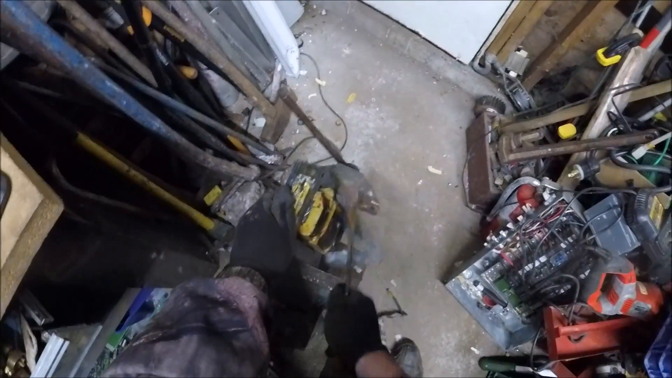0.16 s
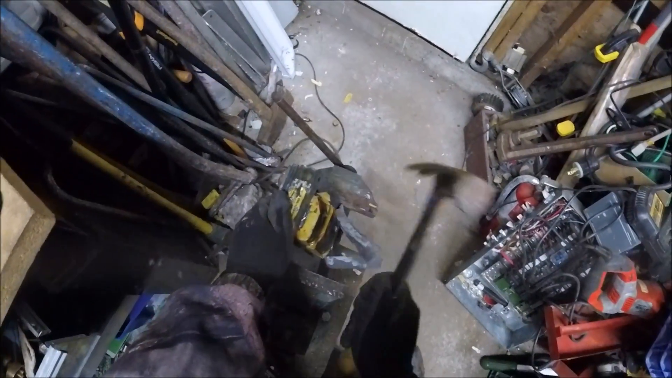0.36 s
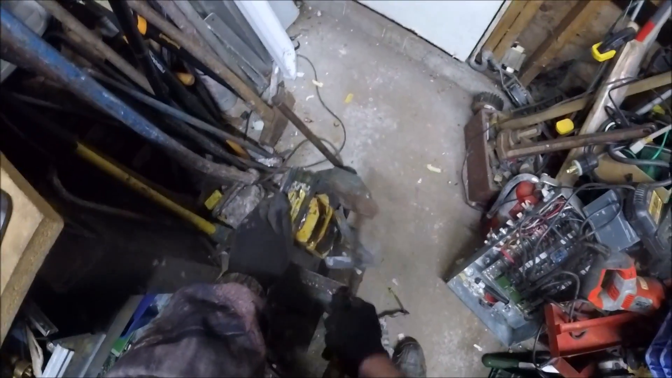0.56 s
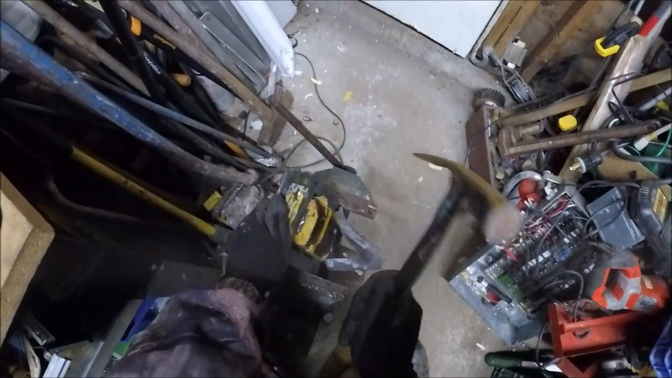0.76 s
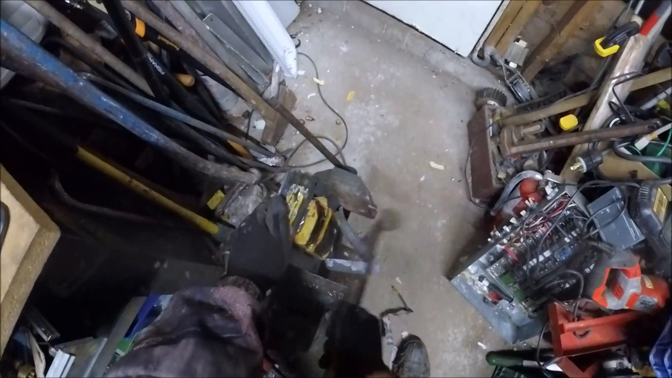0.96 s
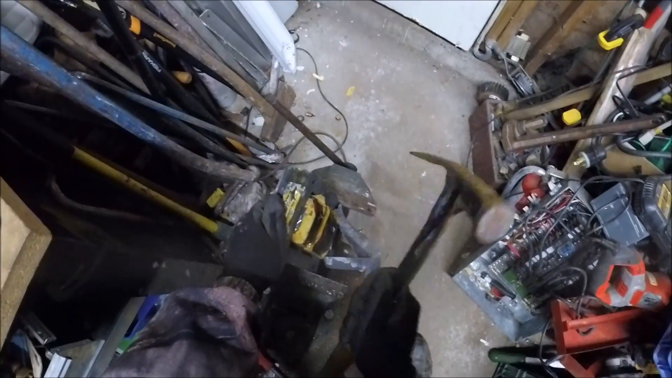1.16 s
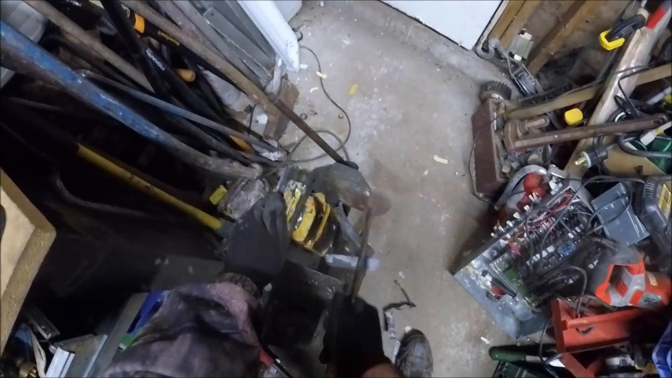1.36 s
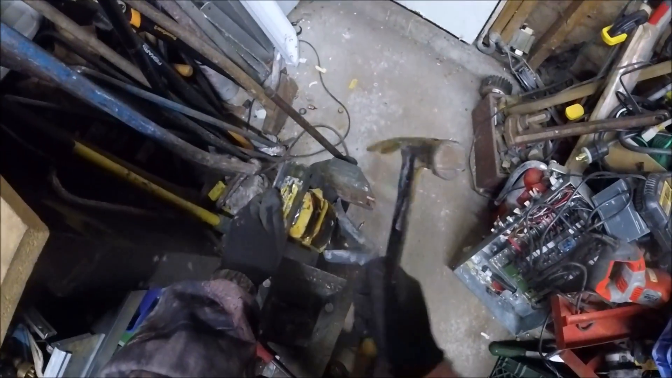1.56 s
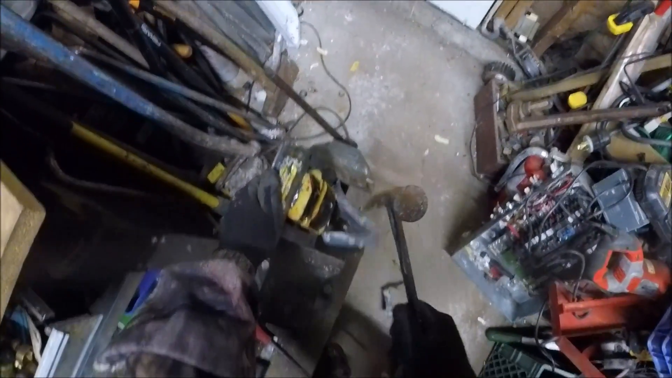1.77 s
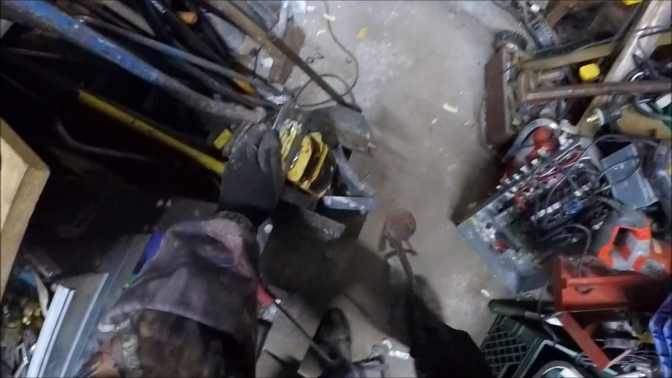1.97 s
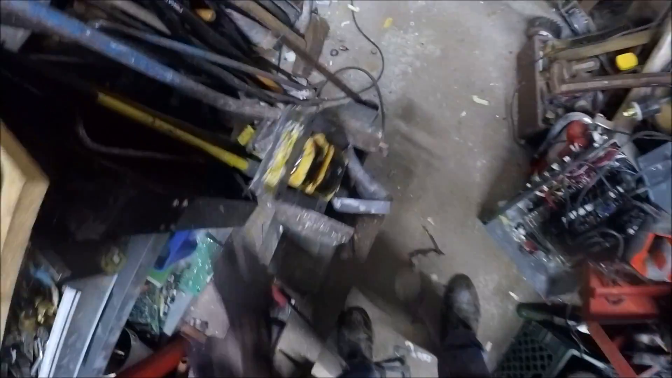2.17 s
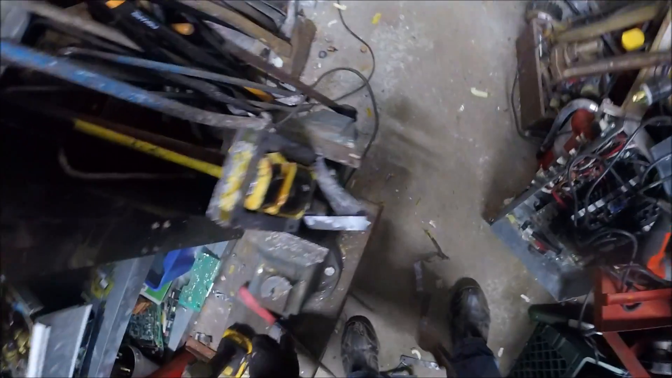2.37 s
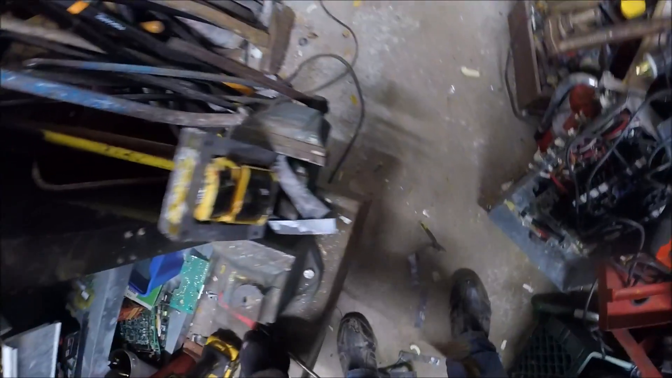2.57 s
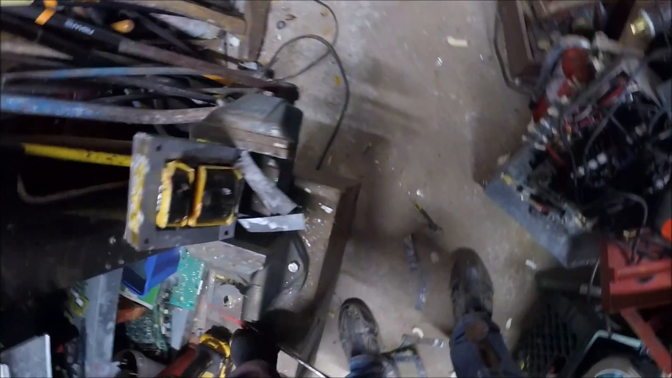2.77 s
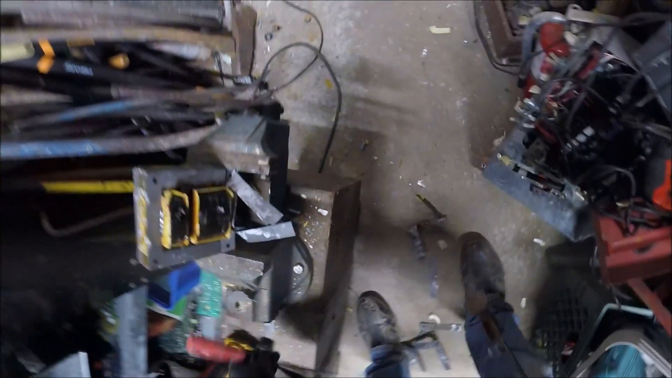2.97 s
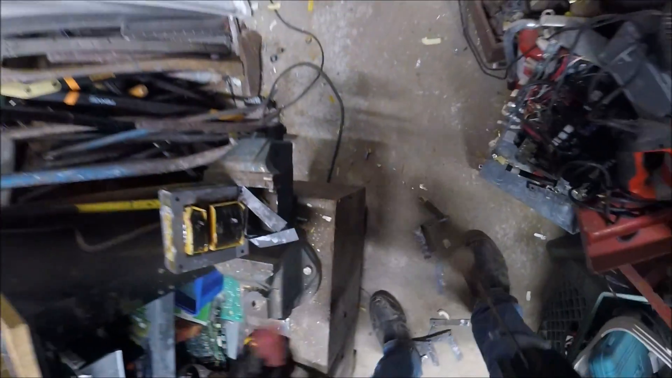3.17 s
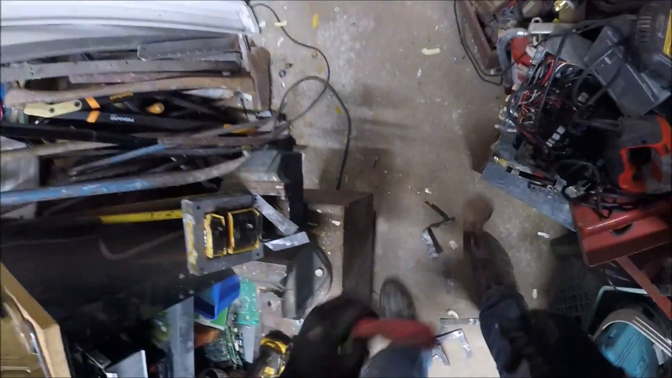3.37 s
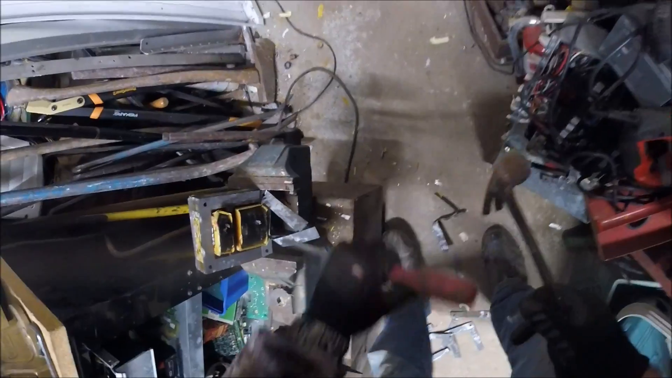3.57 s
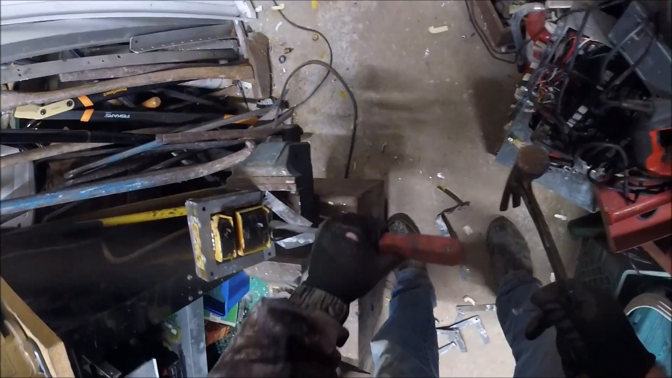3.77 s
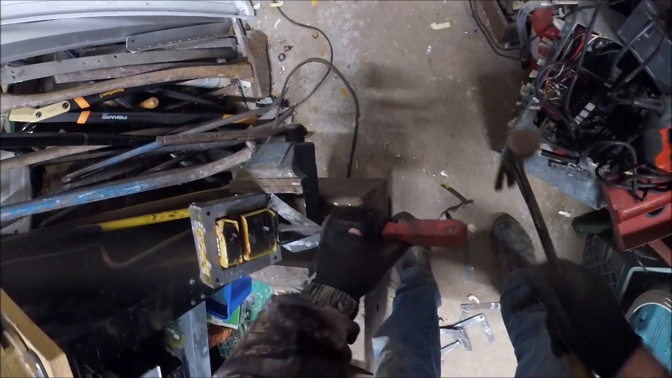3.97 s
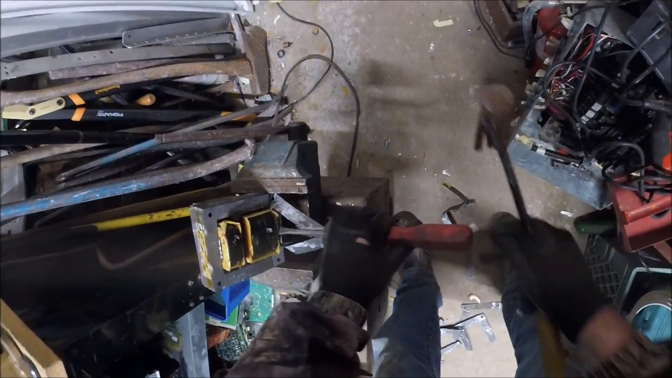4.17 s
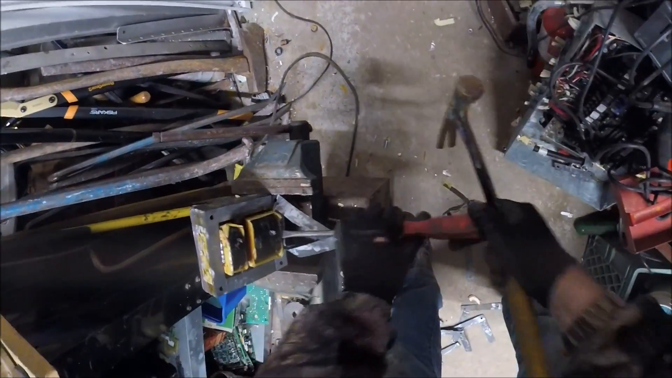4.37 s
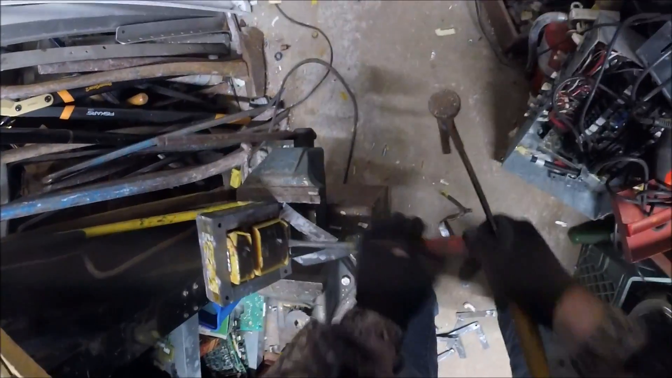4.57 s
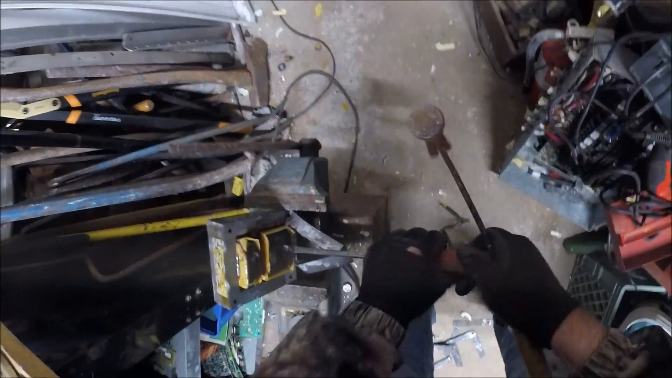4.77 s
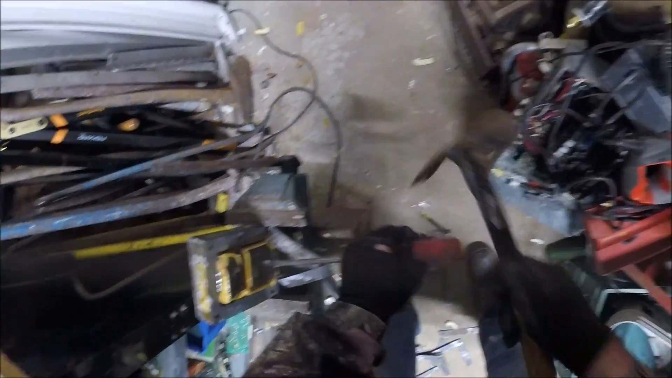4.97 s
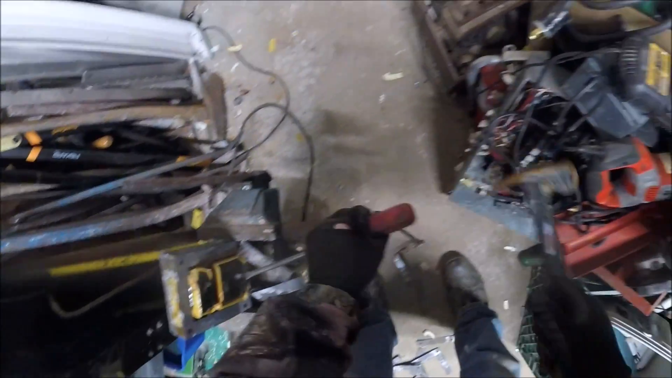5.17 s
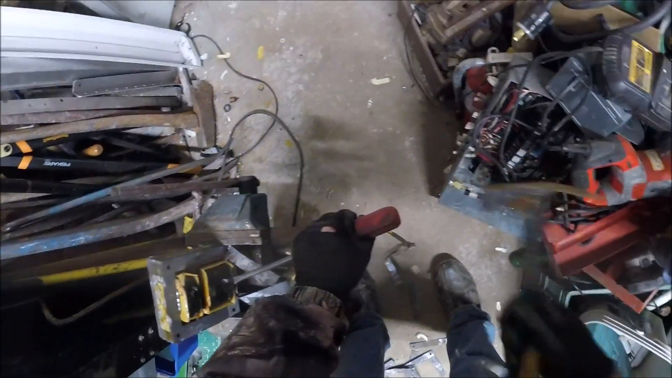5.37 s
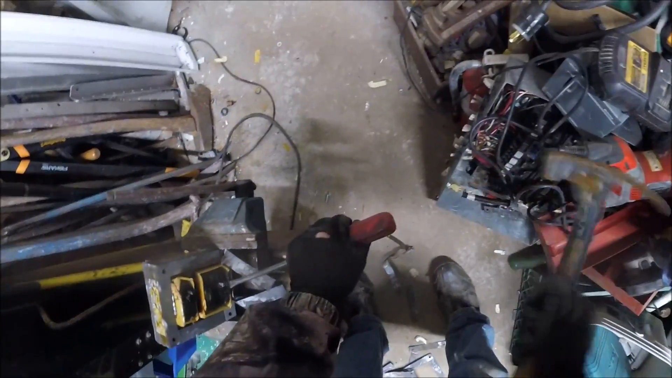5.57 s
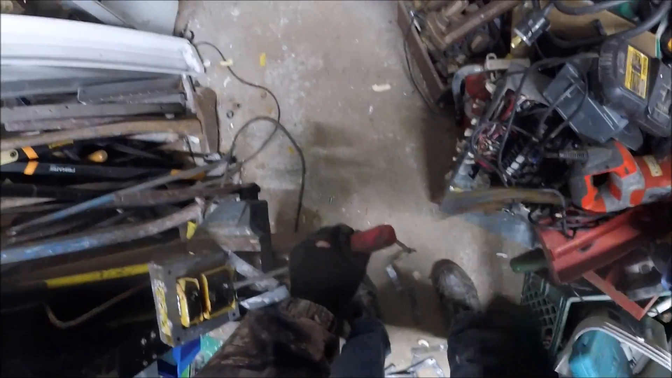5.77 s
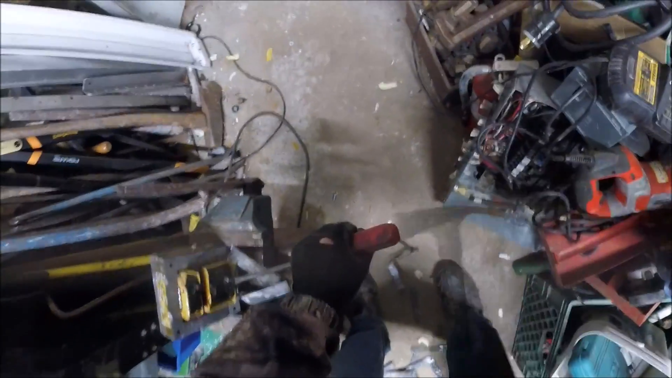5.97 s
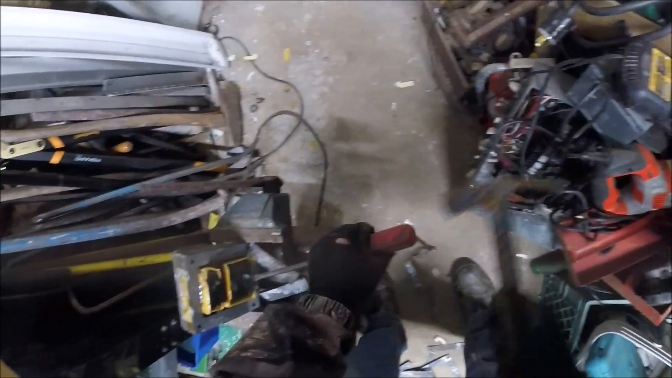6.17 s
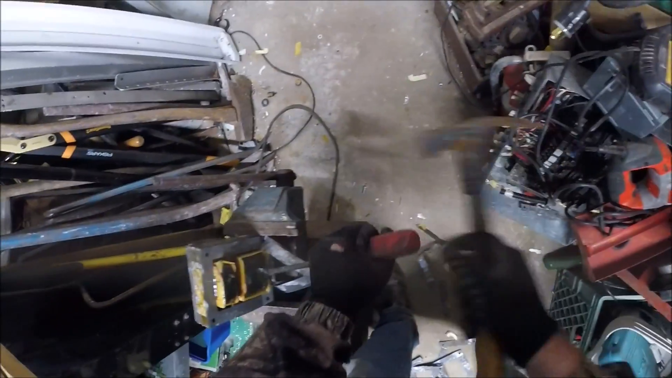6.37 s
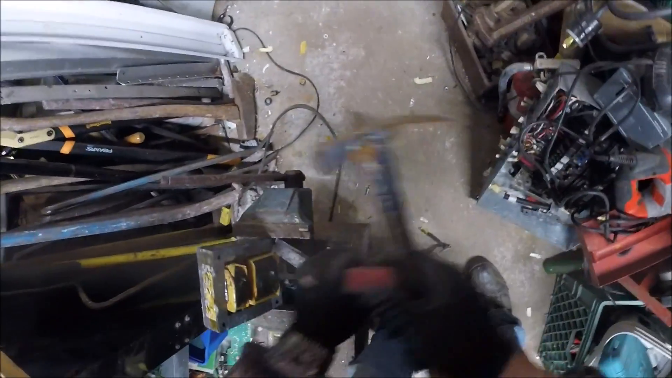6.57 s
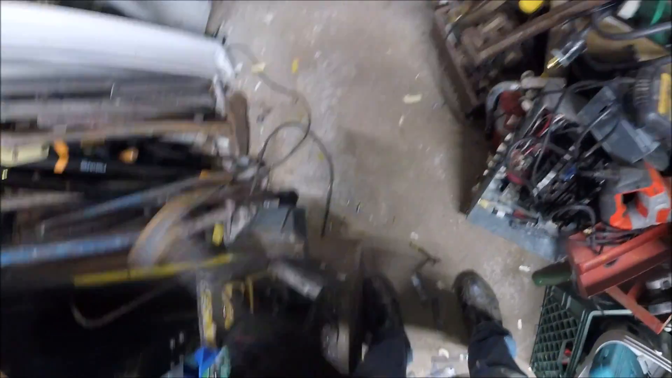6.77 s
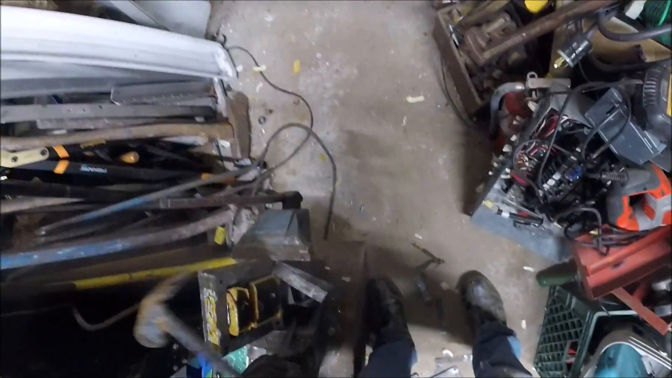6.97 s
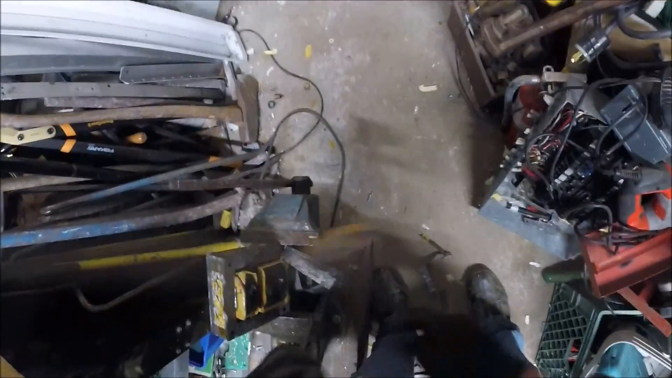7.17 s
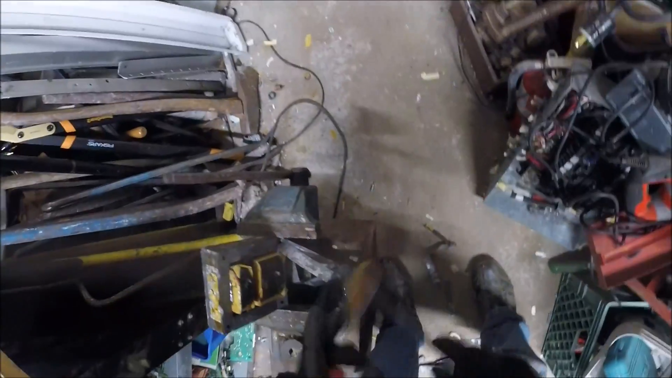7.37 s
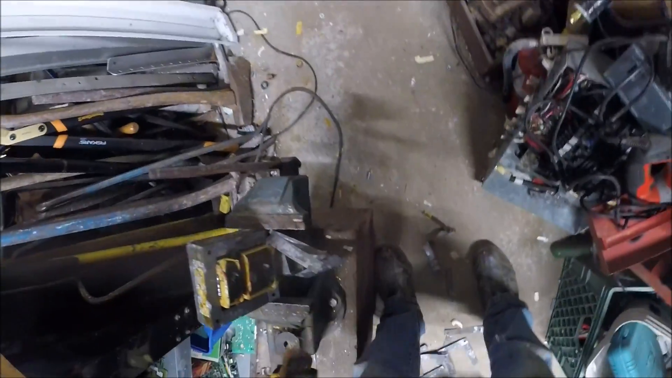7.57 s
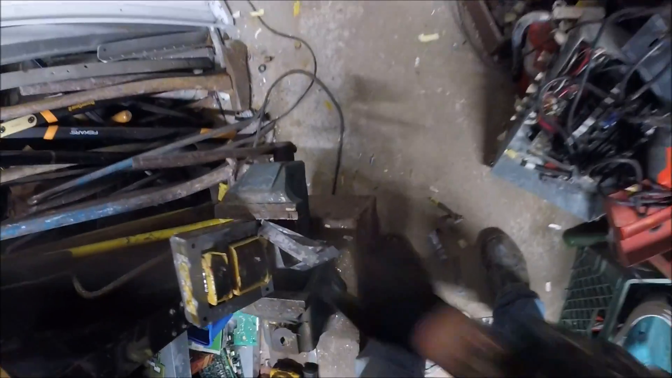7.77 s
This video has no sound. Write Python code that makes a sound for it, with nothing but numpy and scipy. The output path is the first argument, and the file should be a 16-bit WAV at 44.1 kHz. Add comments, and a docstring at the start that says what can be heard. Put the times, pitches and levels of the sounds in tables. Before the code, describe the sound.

Four hard hammer blows on a steel chisel, each bouncing with metallic rattle, then handling, scrap knocks and a small metal core dragged onto a bench.

```python
"""In a cluttered shed, a hammer drives a chisel four times into a small core in a vise; chisel and core
bounce and the loose vise handle ticks on. After some handling the hammer knocks on scrap, and the core
is dragged and set down on the bench. Hits are noise bursts through ringing modes, rubs are slipping noise,
booms and bumps are pushed modes; sparse echoes and moving room tone surround them."""
import sys
import numpy as np
from scipy import signal
from scipy.fft import rfft, irfft, next_fast_len
from scipy.io import wavfile
from scipy.ndimage import uniform_filter1d

SR = 44100
rng = np.random.default_rng(int(sys.argv[2]) if len(sys.argv) > 2 else 0)


def transcribe(u):
    """Save the signal u as a 16-bit wav file named by the first command-line argument.

    u: samples, shape (n,) or (channels, n), limited to [-1, 1]; the rate is SR.
    q: integer samples, one column per channel.
    """
    v = np.clip(np.atleast_2d(u).T, -1, 1)
    q = np.round(v * 32767).astype(np.int16)
    wavfile.write(sys.argv[1], SR, q)


N = 344421

# In strikes and rubs "level" is the treble, and "mids" is the energy of the mids against that treble.
# Spectra and modes hold relative levels; t60 is for a free, undamped part.

# room tone and cloth rustle: (frequency [Hz], relative level [dB])
AIR = [(79, -27), (135, 14.5), (194, 7), (562, -3), (1420, -12), (1990, -17.5), (2590, -14), (3490, -26),
       (5550, -20.5), (10100, -31), (14500, -45.5), (15500, -47.5), (16400, -80.5)]
# how the room tone moves: (time [s], relative low level [dB], relative high level [dB])
STIR = [(0.0, -50, -54), (0.41, -49.5, -51.5), (1.28, -54.5, -60.5), (1.48, -49, -58), (1.61, -51, -59),
        (2.0, -45, -50.5), (2.15, -46.5, -58.5), (2.46, -44, -53), (2.89, -50, -59), (3.44, -42.5, -52),
        (3.81, -43.5, -53.5), (4.28, -50, -62.5), (4.48, -44, -54), (5.07, -50.5, -55), (5.96, -46, -50.5),
        (6.46, -46.5, -58), (6.85, -45.5, -52), (7.81, -45.5, -52.5)]
# echoes of the shed: (frequency [Hz], t60 [s])
SHED_DECAY = [(200, 0.49), (1000, 0.15), (5000, 0.21), (12000, 0.24)]
# narrow bands of hiss: (start [s], end [s], pitch [Hz], width [Hz], mean level [dB])
HISSES = [(2.16, 2.72, 1350, 220, -53.5), (2.09, 2.72, 990, 200, -58.5), (5.113, 5.18, 1660, 1000, -49),
          (2.44, 6.6, 2630, 160, -74.5)]

# gloves and sleeves brush: (start [s], loudest [s], end [s], level [dB], mids [dB])
BRUSHES = [(0.066, 0.11, .16, -50, 4.5), (0.803, 0.821, .89, -49, 0.5), (1.185, 1.215, 1.27, -55, 7.5),
           (1.912, 2.017, 2.1, -49.5, 4.5), (3.156, 3.25, 3.31, -39.5, -19), (3.299, 3.394, 3.46, -48, -7),
           (3.517, 3.556, 3.6, -42, 3), (3.996, 4.033, 4.08, -44, -2), (4.38, 4.399, 4.45, -37.5, -7),
           (4.924, 4.984, 5.02, -54.5, -5), (5.264, 5.29, 5.45, -52.5, -3)]
# soft bumps of boots and hands; the first row is the bench still ringing from an earlier blow: (time [s], peak
# [dB], pitch [Hz])
BUMPS = [(0.004, -44, 412), (2.059, -36, 227), (3.855, -23.5, 217), (4.036, -32.5, 213), (4.4, -33.5, 267),
         (6.493, -35, 343), (7.249, -28.5, 350), (7.776, -35.5, 283)]
# the loose vise handle and small parts tick: (time [s], level [dB], favoured ring [Hz])
TICKS = [(0.0165, -33, 5400), (0.1131, -33.5, 5560), (0.345, -30.5, 5260), (0.3855, -34, 5800),
         (0.4277, -34, 6240), (0.4752, -33, 6170), (0.717, -40.5, 5250), (0.764, -38.5, 4940),
         (1.4044, -22, 4750), (1.454, -20, 5300), (1.498, -28.5, 5200), (1.581, -28, 6200),
         (1.6323, -32, 6980), (1.7426, -34, 4400), (1.7923, -34, 4930), (1.8484, -33, 5900),
         (1.8972, -30, 5450), (2.0048, -29, 6080), (2.054, -34.5, 5740), (2.111, -42, 4680),
         (2.163, -42.5, 6230), (2.325, -34, 4770), (2.376, -35.5, 6460), (2.477, -50, 4900),
         (2.5676, -53, 4900), (2.6574, -45, 5270), (3.1667, -43, 5220), (3.2157, -35.5, 5130),
         (3.71, -51, 5240), (3.8372, -48, 5350), (4.265, -40, 7570), (4.275, -43.5, 5400),
         (4.3084, -47, 5100), (4.3834, -33, 4960), (4.529, -43.5, 5500), (4.5591, -37.5, 5240),
         (4.6039, -39.5, 5300), (4.6305, -36.5, 5700)]
# a hollow part is knocked: (time [s], peak [dB], rings for [s], damping factor, favoured ring [Hz])
CLUNKS = [(7.474, -23.5, 0.061, 0.73, 396), (7.537, -17.5, 0.034, 1.5, 2370)]
# the chisel touches the hammer: (time [s], peak [dB])
CLINKS = [(4.3829, -36), (4.4016, -23)]

# fast sweep of the core towards the bench: (time [s], level [dB], mids [dB])
SWEEP = [(6.68, 6, 17), (6.686, -27, -2.5), (6.728, -21, -8.5), (6.753, -28.5, -9), (6.764, -15.5, -0.5),
         (6.794, -42, 4.5), (6.92, -48.5, 3)]
# the core drags over the bench: (start [s], loudest [s], end [s], level [dB], mids [dB])
DRAGS = [(6.93, 7.072, 7.11, -38, 6.5), (7.086, 7.119, 7.2, -35, 9), (7.221, 7.237, 7.29, -38.5, 8.5),
         (7.325, 7.354, 7.4, -26.5, 2)]
# the dragged core catches and slips: (time [s], level [dB], mids [dB])
SLIPS = [(6.9702, -41, -2), (6.9915, -38.5, 10), (7.007, -30.5, 3), (7.0228, -28.5, 3), (7.0326, -28.5, -1),
         (7.044, -26, -5), (7.0537, -22, -11), (7.0612, -23, -15), (7.084, -31.5, 5), (7.1148, -26, -2),
         (7.1222, -21.5, -6), (7.1394, -32, -6), (7.1561, -32, 3), (7.2479, -32.5, -8), (7.2555, -38, 17.5),
         (7.3372, -23, -10), (7.3541, -15.5, -8), (7.3597, -19, -14)]
# the hammer knocks on scrap, then the core lands on the bench:
KNOCKS = [(5.67, -9.5, 1.5, 1034, -9.5), (5.7735, -34, -17, 6100, None), (5.881, -43, -27.5, 5260, None),
          (5.9803, -9.5, -1, 1034, -12.5), (6.2126, -8.5, -16.5, 5200, -40), (6.4744, -22, -10, 5200, None),
          (6.5595, -31, -15, 5550, None), (6.636, -35.5, -6, 4590, None), (6.6512, -23, -10, 4850, None),
          (6.6868, -21.5, -7, 5600, -23.5), (6.7197, -15.5, -8, 5640, None),
          (6.7543, -14.5, -0.5, 5350, -24), (6.7624, -19, 3.5, 1460, -15.5), (7.5394, -27, 14.5, 2270, -32),
          (7.626, -50, 1, 4970, None)]
# the chisel skids off the core: (start [s], loudest [s], end [s], level [dB], mids [dB])
SKID = (1.408, 1.424, 1.448, -19, -14)
# chisel blows: (time [s], level [dB], chisel seats after [s], seating level [dB], bounce after [s],
# bounce level [dB], bounce mids [dB], last bounce after [s], last bounce level [dB],
# bench boom reference [dB], boom peak of the bounce [dB])
BLOWS = [(0.161, -13, 0.0063, -11.5, 0.043, -11.5, -20, 0.082, -24, -13, -26),
         (0.5257, -14.5, 0.0058, -12, 0.035, -11, -16, .074, -23.5, -15, -22),
         (0.895, -10, 0.01, -13, 0.041, -13.5, -5, .0582, -10.5, -16.5, -18.5),
         (1.281, -10.5, .0072, -14.5, .0347, -13.5, -5.5, .0565, -13, -16, -7)]
# bench booms under each blow: (after the blow [s], peak against the boom reference [dB], favoured ring [Hz])
BOOMS = [(.005, -0.5, 298), (.021, -2.5, 357), (.049, -6, 160)]

# hollow part: (frequency [Hz], relative level [dB], t60 [s])
HOLLOW = [(430, -8, .3), (942, -1, .16), (1160, -10, .1), (2336, -6, .08), (3800, -15, .04),
          (5642, -14, .07)]
# lone chisel: (frequency [Hz], relative level [dB], t60 [s])
CHISEL = [(3540, -6, 0.065), (4450, -16, 0.11), (5000, 0, .15), (5520, -10, .06), (6000, -10, 0.11)]
# small core: (frequency [Hz], relative level [dB], t60 [s])
CORE = [(624, -17, .1), (754, -17, .1), (943, -14, .08), (1443, -9, .12), (1575, -10, .1), (1696, -11, .09),
        (1857, -10, .1), (2100, -14, .07), (2336, -8, .09), (2772, -16, .06), (3332, -18, .05),
        (3795, -8, .045), (4474, -13, .045), (5249, -5, .04), (5459, 0, .045), (5766, -5, .04),
        (7472, -18, .05)]
# scrap metal: (frequency [Hz], relative level [dB], t60 [s])
SCRAP = [(1034, -38, .55), (1720, -20, .08), (2570, -18, .08), (3300, -20, .1), (4600, -10, .1),
         (4900, -5, .09), (5100, 0, .05), (5450, -3, .07), (5880, -5, .1), (6200, -6, .1), (6400, -8, .1),
         (7500, -12, .08), (8100, -13, .07), (9000, -20, .07)]
# bench: (frequency [Hz], relative level [dB], t60 [s])
BENCH = [(154.2, 2.5, 0.29), (181.7, 4.5, 0.13), (222.5, 4, 0.17), (266.5, 10, 0.078), (314.8, 0.5, 0.16),
         (362, 3, 0.12), (514, -10, 0.066), (649, 2.5, 0.058), (773, -8, 0.04), (940, 3, 0.055)]
# vise and chisel steel: (frequency [Hz], relative level [dB], t60 [s])
VISE = [(4000, -59.5, 0.084), (4470, -22, 0.31), (4830, -4, 0.13), (5280, 4, 0.04), (5800, 5.5, 0.013),
        (6296, -0.5, 0.043), (7030, -1, 0.016), (6970, -6.5, 0.046), (7570, 4.5, 0.028),
        (8300, -3.5, 0.029), (8460, -22, 0.13), (9020, -52.5, 0.04), (9889, -34, 0.22),
        (10160, -16.5, 0.17), (10560, -13, 0.054), (11630, -32, 0.2)]

# colour of the brushes and the sweep: (frequency [Hz], relative level [dB])
RUB = [(240, -66.5), (400, -10), (818, -15), (955, -8.5), (1920, -9.5), (2920, -7), (4180, -4), (5200, 3),
       (10100, -14), (14700, -53), (16400, -86.5)]
# colour of core on bench: (frequency [Hz], relative level [dB])
SCUFF = [(240, -44), (400, -24), (768, -2), (912, -8), (1590, -10), (3020, -5), (5440, 2), (6460, -11),
         (9980, -22), (16400, -75)]
# colour of steel on steel: (frequency [Hz], relative level [dB])
CRACK = [(260, -26.5), (450, -11.5), (564, -17.5), (1210, -9), (2090, -12.5), (3430, -7), (3810, -13),
         (5720, 3.5), (6550, -8.5), (10100, -11), (12000, -28), (13900, -26), (16400, -69)]

SIZE = 13824  # length of a ring or burst, in samples
LOW_CUT_HZ, EDGE_HZ, DEEP_DB = 157.5, 16450, -75
PLACE_DB = 3.5  # how much the struck spot changes each mode
PRESSED, HELD = 2.2, 4.0  # how much faster parts die out pressed on the bench or held in gloves
# from when ticking parts are held, the core is hit, the core lies down
IN_GLOVES_S, ON_CORE_S, ON_BENCH_S = 3, 6.6, 7
# stroke edges, against the loudest moment
BRUSH_START_DB, BRUSH_END_DB = -17.5, -12
DRAG_START_DB, DRAG_END_DB = -13, -24
SKID_START_DB, SKID_END_DB = -4, -10
TICK_MIDS_DB, TICK_CONTACT_S, HELD_CONTACT_S = -12, 0.0045, 0.002
SLIP_CONTACT_S = 0.0017
KNOCK_CONTACT_S, KNOCK_BOOM_S, SCRAP_BOOM_HZ, CORE_BOOM_HZ = 0.0023, 0.0035, 163, 293
BLOW_MIDS_DB, BLOW_CONTACT_S = -9, 0.0023
SEAT_MIDS_DB, SEAT_CONTACT_S = -4, 0.0036
BOUNCE_CONTACT_S, BOUNCE_BOOM_HZ = 0.0035, 350
LAST_MIDS_DB, LAST_CONTACT_S = -16.5, 0.0032
# stray contacts after each blow: count, span, level against the blow, further fade over the span
RATTLES, RATTLE_S, RATTLE_DB, RATTLE_FADE_DB = 4, 0.12, -4, -22
RATTLE_MIDS_DB, RATTLE_CONTACT_S = -18.5, 0.0023


def gain_of(db):
    """Decibels to amplitude."""
    return np.exp(np.asarray(db) * np.log(10) / 20)


def evened(x):
    """Bring the RMS to 1."""
    return x / np.sqrt(np.mean(x ** 2) + 1e-20)


def read(points, hz):
    """Read a table of (frequency, value) along log frequency."""
    f, value = np.transpose(points)
    return np.interp(np.log(hz + 1), np.log(f + 1), value)


def add(mix, s, sound):
    """Lay a sound into the mix at a time in seconds."""
    part = mix[round(s * SR):][:len(sound)]
    part += sound[:len(part)]


def room_tone():
    """Patchy noise whose low and high parts rise as the worker moves; the treble flickers."""
    frames, hz = N // 128 + 9, np.fft.rfftfreq(1024, 1 / SR)
    real, imag, patches = rng.standard_normal((frames, 513, 3)).T
    patches = uniform_filter1d(patches, 14, 0)  # smooth over frequency, then time
    patches = evened(uniform_filter1d(patches, 16, 1))
    flicker = evened(uniform_filter1d(rng.standard_normal(frames), 8))
    s, low_db, high_db = np.transpose(STIR)
    t = np.arange(frames) * 128 / SR
    air = gain_of(read(AIR, hz))
    # take out the energy of each band, so that the movement table sets it
    low = np.interp(t, s, low_db) - 10 * np.log10(np.sum(air[(hz > 130) & (hz < 700)] ** 2))
    high = np.interp(t, s, high_db) - 10 * np.log10(np.sum(air[hz > 3000] ** 2))
    # crossfade from low to high between 500 and 3500 Hz
    share = np.clip(np.log((hz + 1) / 500) / np.log(7.0), 0, 1)[:, None]
    stirred = (1 - share) * low + share * (high + 2.9 * flicker)
    stirred += 1.6 * patches
    z = (real + 1j * imag) * air[:, None] * gain_of(stirred)
    return signal.istft(z, nperseg=1024, noverlap=896)[1][:N]


def shed(x):
    """Sparse echoes of random sign, each band dying at its own speed."""
    taps = np.zeros(SR // 2)
    at = np.arange(160, len(taps) - 20, 20)
    taps[at + rng.integers(0, 20, len(at))] = rng.choice([-1., 1.], len(at))
    hz, t, z = signal.stft(taps, SR, nperseg=256)
    fade = gain_of(-60 * t / read(SHED_DECAY, hz)[:, None])
    tail = signal.istft(z * fade, SR, nperseg=256)[1]
    return signal.fftconvolve(x, tail / np.linalg.norm(tail))[:N]


def hiss(start, end, hz, width_hz, db):
    """Noise in one narrow resonance, fading in and out and wavering a little."""
    n = round((end - start) * SR)
    band = signal.butter(2, [hz - width_hz / 2, hz + width_hz / 2], "band", fs=SR, output="sos")
    waver = evened(uniform_filter1d(rng.standard_normal(n), 4000))
    x = evened(signal.sosfilt(band, rng.standard_normal(n)))
    return start, x * signal.windows.tukey(n, .15) * gain_of(db + 2.0 * waver)


def ring(modes, spread_db, detune, damping=1.0, best_hz=0, best_db=12.5):
    """Dying sines; where the blow lands decides how strongly each one speaks."""
    hz, db, t60 = np.transpose(modes)[:, :, None]
    t = np.arange(SIZE) / SR
    level_luck, pitch_luck = rng.standard_normal((2, len(modes), 1))
    favour = np.exp(-(np.log((best_hz + 1) / hz) / 0.065) ** 2)  # lifts modes near best_hz
    db = db + spread_db * level_luck + best_db * favour
    fade_db = 60 * t * damping / np.clip(t60, .005, 1)
    sines = np.sin(2 * np.pi * hz * (1 + detune * pitch_luck) * t)
    x = (gain_of(db - fade_db) * sines).sum(0) * np.minimum(t / 0.00043, 1)
    return x / np.linalg.norm(x)


def steel(drive, colour, rings, ring_db):
    """Contact noise heard directly and through the ringing part, as treble and mids of energy 1."""
    size = next_fast_len(len(drive) + SIZE)
    hz = np.fft.rfftfreq(size, 1 / SR)
    direct = gain_of(read(colour, hz))
    body = direct / np.sqrt(np.mean(direct ** 2)) + gain_of(ring_db) * rfft(rings, size)
    heard = rfft(drive, size) * body
    treble = 1 / (1 + (3300 / (hz + 1)) ** 8)  # split at 3300 Hz
    high = irfft(heard * treble, size)[:size - SIZE // 4]
    mid = irfft(heard * (1 - treble), size)[:size - SIZE // 4]
    return high / np.linalg.norm(high), mid / np.linalg.norm(mid)


def strike(db, mid_db, contact, colour, rings, ring_db, chatter_db, chatter_s):
    """A short burst, then the loose parts chatter out in tiny uneven contacts."""
    t = np.arange(SIZE) / SR
    touches = rng.exponential(1, SIZE) * (rng.random(SIZE) < 600.0 / SR)
    chatter = 1.6 + evened(signal.lfilter([1], [1, -.985], touches))
    burst = np.exp(-(t / max(contact, 3e-4)) ** 2)
    shape = burst + gain_of(chatter_db) * chatter * np.exp(-t / chatter_s)
    drive = shape * np.minimum(t / 0.00042, 1) * rng.standard_normal(SIZE)
    high, mid = steel(drive, colour, rings, ring_db)
    peak = np.sqrt(uniform_filter1d(high ** 2, 128).max())  # loudest short-term treble
    return gain_of(db) * (high + gain_of(mid_db) * mid) / peak


def thud(db, rings, push_s):
    """One smooth push sets the modes going."""
    x = signal.fftconvolve(rings, np.hanning(round(push_s * SR) + 3))
    return gain_of(db) * x / np.abs(x).max()


def boom(db, hz, push_s=0.0011):
    """The bench modes pushed by a hit, strongest around one pitch."""
    return thud(db, ring(BENCH, 3.8, 0.021, best_hz=hz), push_s)


def rub(rows, colour, ring_db, damping, slips_per_s, grain_db):
    """Uneven slips under the stroke, over a steady hiss, pass through the pressed and damped part."""
    s, db, mid_db = np.transpose(rows)
    t = np.arange(s[0], s[-1], 1 / SR)
    slips = gain_of(3.4 * np.minimum(rng.exponential(1, len(t)), 3))
    slips *= rng.random(len(t)) < slips_per_s / SR
    grain = 1 + gain_of(grain_db) * evened(signal.lfilter([1], [1, -.99], slips))
    stroke = gain_of(np.interp(t, s, db)) * signal.windows.tukey(len(t), .15)
    drive = stroke * evened(grain) * rng.standard_normal(len(t))
    high, mid = steel(drive, colour, ring(CORE, 2.0, .005, damping), ring_db)
    mid_gain = gain_of(np.interp(s[0] + np.arange(len(mid)) / SR, s, mid_db))
    return s[0], np.linalg.norm(stroke) * (high + mid * mid_gain)


def stroke_rows(start, loudest, end, db, mid_db, start_db, end_db):
    """A stroke swells to its loudest moment and fades."""
    return [(start, db + start_db, mid_db), (loudest, db, mid_db), (end, db + end_db, mid_db)]


def add_brushes(near):
    """Gloves and sleeves brush: soft sparse-grained rubs with a heavily damped ring."""
    for row in BRUSHES:
        rows = stroke_rows(*row, BRUSH_START_DB, BRUSH_END_DB)
        add(near, *rub(rows, RUB, ring_db=-14.0, damping=HELD, slips_per_s=160, grain_db=-2.5))


def add_bumps(near):
    """Boots and hands bump, and at the start the bench still rings: two low modes under a slow push."""
    for s, db, hz in BUMPS:
        modes = [(hz, 0, .1), (1.4 * hz, -5, .08)]
        add(near, s, thud(db, ring(modes, 1.5, 0.008), push_s=0.0031))


def add_ticks(near):
    """The vise handle and small parts tick; later ticks come from parts damped by the gloves."""
    for s, db, hz in TICKS:
        held = s > IN_GLOVES_S
        rings = ring(VISE, PLACE_DB, 0.0041, HELD if held else 1, hz)
        contact = HELD_CONTACT_S if held else TICK_CONTACT_S
        add(near, s, strike(db, TICK_MIDS_DB, contact, CRACK, rings,
                            ring_db=1.0, chatter_db=-1.5, chatter_s=0.013))


def add_clunks(near):
    """A hollow part is pushed into ringing; held again, it stops."""
    for s, db, rings_s, damping, hz in CLUNKS:
        sound = thud(db, ring(HOLLOW, 0.82, 0.0039, damping, hz), push_s=.0001)
        sound = sound[:round(rings_s * SR)]
        stop = np.minimum(np.arange(len(sound))[::-1] / 300, 1)
        add(near, s, sound * stop)


def add_clinks(near):
    """The chisel touches the hammer: a very short push rings the chisel alone."""
    for s, db in CLINKS:
        add(near, s, thud(db, ring(CHISEL, 1.5, 0.0011), push_s=.00002))


def add_drags(near):
    """The core sweeps towards the bench and drags over it, with sharp single catches and slips."""
    add(near, *rub(SWEEP, RUB, ring_db=-9.0, damping=HELD, slips_per_s=970, grain_db=-8.0))
    for row in DRAGS:
        rows = stroke_rows(*row, DRAG_START_DB, DRAG_END_DB)
        add(near, *rub(rows, SCUFF, ring_db=1.5, damping=PRESSED, slips_per_s=370, grain_db=-2.0))
    for s, *slip in SLIPS:
        rings = ring(CORE, PLACE_DB, 0.0059, PRESSED)
        add(near, s, strike(*slip, SLIP_CONTACT_S, SCUFF, rings,
                            ring_db=10.5, chatter_db=-42.0, chatter_s=0.0075))


def add_knocks(near):
    """Knocks ring the scrap, later the core; some also boom the bench."""
    for s, db, mid_db, hz, boom_db in KNOCKS:
        on_scrap = s < ON_CORE_S
        rings = ring(SCRAP if on_scrap else CORE, PLACE_DB, 0.003, best_hz=hz)
        colour = CRACK if s < ON_BENCH_S else SCUFF
        add(near, s, strike(db, mid_db, KNOCK_CONTACT_S, colour, rings,
                            ring_db=-10.0, chatter_db=-17.5, chatter_s=0.013))
        if boom_db:
            add(near, s + KNOCK_BOOM_S, boom(boom_db, SCRAP_BOOM_HZ if on_scrap else CORE_BOOM_HZ))


def add_skid(near):
    """The chisel skids off the core: dense slips in the colour of steel on steel."""
    rows = stroke_rows(*SKID, SKID_START_DB, SKID_END_DB)
    add(near, *rub(rows, CRACK, ring_db=-9.0, damping=HELD, slips_per_s=900, grain_db=-6.0))


def contacts(s, db, seat, seat_db, bounce, bounce_db, bounce_mid_db, last, last_db):
    """The blow, the chisel seating, two bounces and a few stray contacts that weaken with time."""
    late = (np.arange(RATTLES) + rng.random(RATTLES)) / RATTLES
    stray = [(s + RATTLE_S * u, db + RATTLE_DB + RATTLE_FADE_DB * u, RATTLE_MIDS_DB, RATTLE_CONTACT_S)
             for u in late]
    return [(s, db, BLOW_MIDS_DB, BLOW_CONTACT_S),
            (s + seat, seat_db, SEAT_MIDS_DB, SEAT_CONTACT_S),
            (s + bounce, bounce_db, bounce_mid_db, BOUNCE_CONTACT_S),
            (s + last, last_db, LAST_MIDS_DB, LAST_CONTACT_S)] + stray


def add_blows(near):
    """Each blow is a run of steel contacts ringing vise and chisel, with the bench booming beneath."""
    for *blow, boom_db, bounce_boom_db in BLOWS:
        blow_s, bounce_after = blow[0], blow[4]
        for s, *touch in contacts(*blow):
            rings = ring(VISE, PLACE_DB, 0.01)
            add(near, s, strike(*touch, CRACK, rings, ring_db=-6.0, chatter_db=-17.5, chatter_s=0.035))
        for after, db, hz in BOOMS:
            add(near, blow_s + after, boom(boom_db + db, hz))
        add(near, blow_s + bounce_after, boom(bounce_boom_db, BOUNCE_BOOM_HZ, push_s=0.00023))


def scene():
    """All hits, rubs, bumps and hisses, their echoes and the room tone."""
    near = np.zeros(N)
    for row in HISSES:
        add(near, *hiss(*row))
    add_brushes(near)
    add_bumps(near)
    add_ticks(near)
    add_clunks(near)
    add_clinks(near)
    add_drags(near)
    add_knocks(near)
    add_skid(near)
    add_blows(near)
    return (room_tone() + near + gain_of(-15.5) * shed(near))[None]


def record(dry):
    """Low cut, a faint deep noise, soft overload, then the band limit."""
    cut = signal.sosfilt(signal.butter(8, LOW_CUT_HZ, "high", fs=SR, output="sos"), dry)
    deep_filter = signal.butter(2, 62.0, fs=SR, output="sos")
    deep = signal.sosfilt(deep_filter, rng.standard_normal(dry.shape))
    clipped = .97 * np.tanh((cut + gain_of(DEEP_DB) * evened(deep)) / .97)
    band_limit = signal.firwin(511, EDGE_HZ, window=("kaiser", 9), fs=SR)
    return signal.oaconvolve(clipped, band_limit[None], "same")


dry = scene()
out = record(dry)
transcribe(out)
```